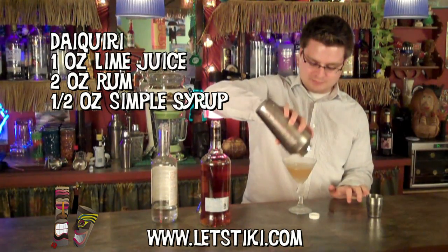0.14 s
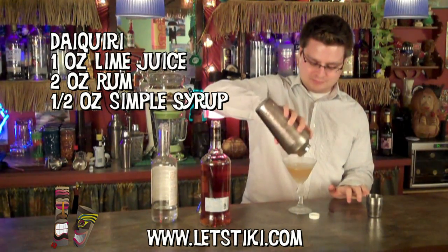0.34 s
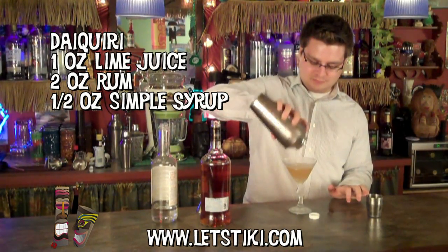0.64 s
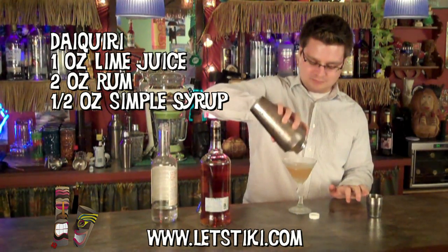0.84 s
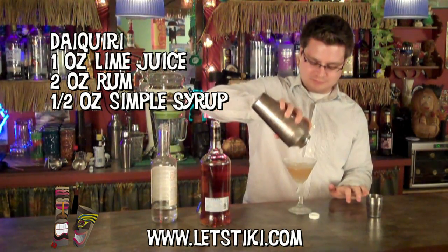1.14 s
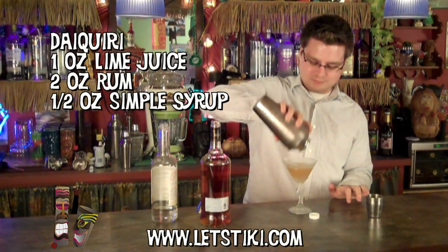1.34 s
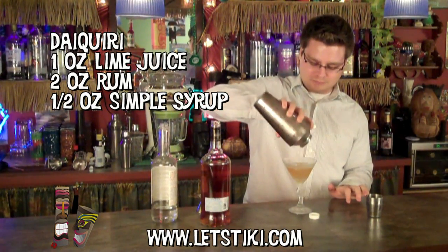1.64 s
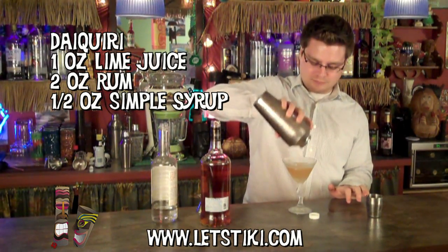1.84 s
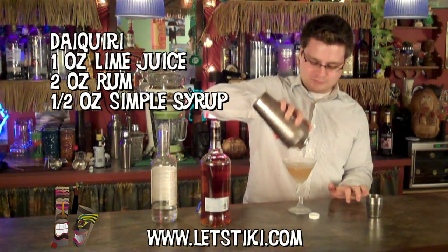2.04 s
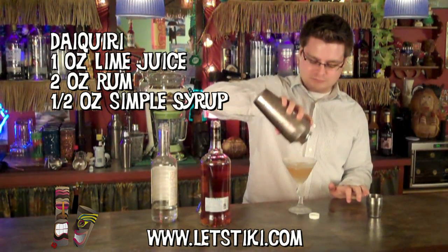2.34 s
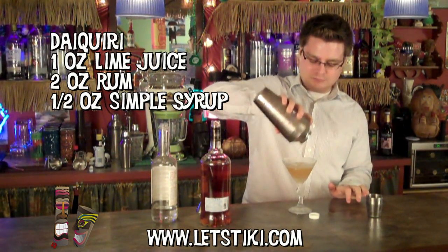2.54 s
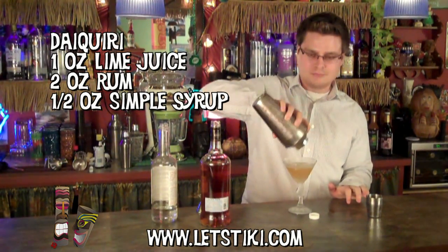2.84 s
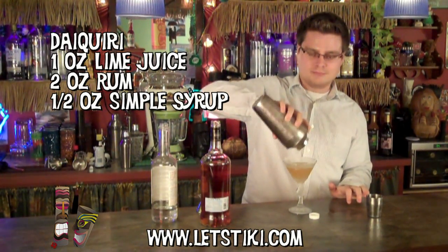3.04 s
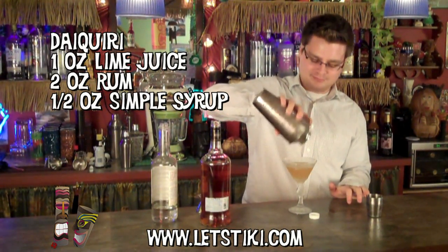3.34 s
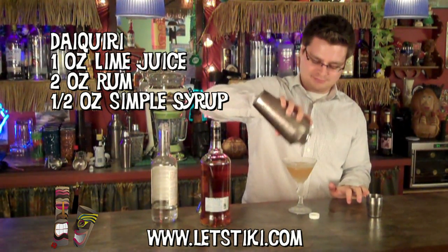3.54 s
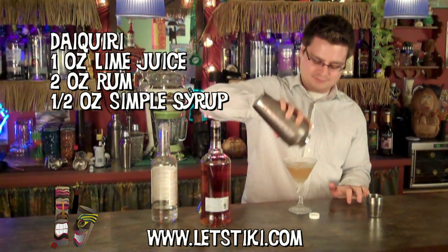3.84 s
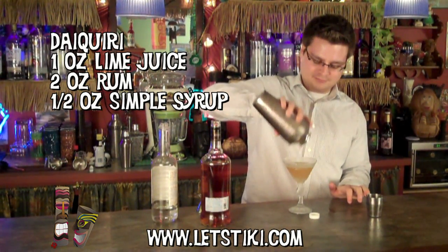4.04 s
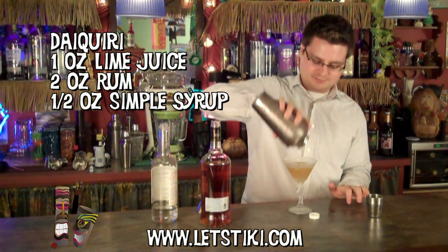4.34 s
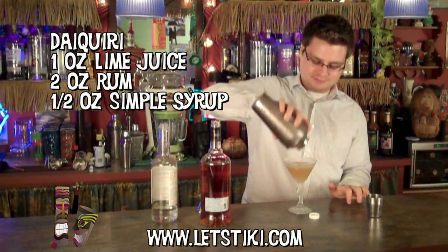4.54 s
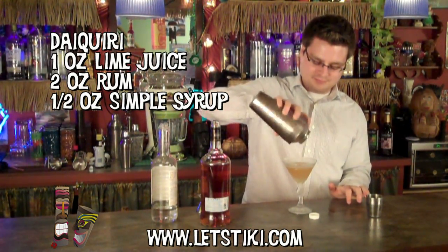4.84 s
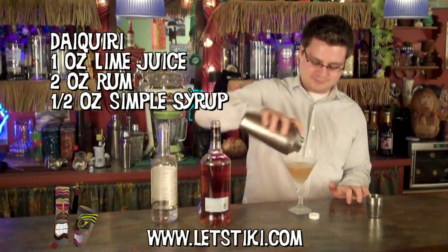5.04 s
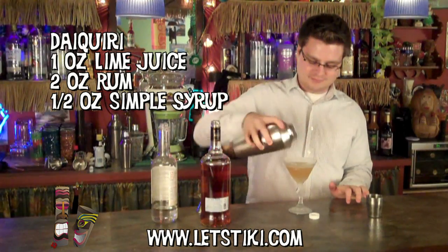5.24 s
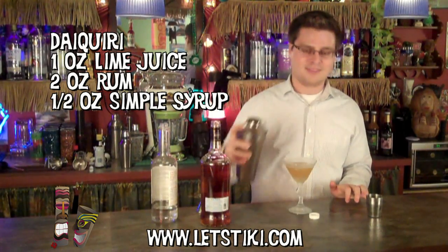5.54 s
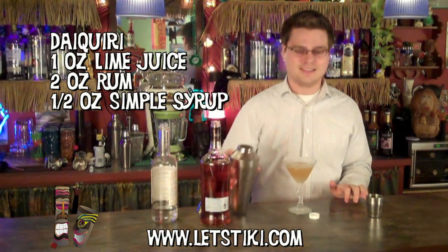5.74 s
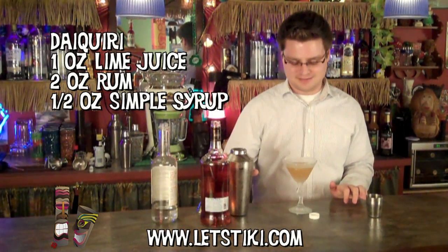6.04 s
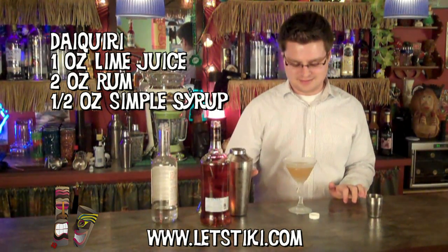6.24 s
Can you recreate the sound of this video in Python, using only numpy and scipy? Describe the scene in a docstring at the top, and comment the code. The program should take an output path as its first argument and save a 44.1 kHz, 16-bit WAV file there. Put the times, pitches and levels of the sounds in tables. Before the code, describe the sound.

Crushed ice rattles in a metal cocktail shaker jogged five or six times a second, then tumbles as it turns upright and is set on wood.

```python
"""Crushed ice rattles in a steel cocktail shaker jogged spout-down over a glass, five to six strokes a second.
Each heap lands and then slides: crackling noise, damped clinks and single lumps drive the resonances of the wall.
The shaker is turned upright and the ice slides to the bottom, ringing the freed wall; last, it is set down on a
wooden bar, whose resonances are pushed by each contact. Throughout, a small furnished room answers with decaying
noise tails, over a rush of air; each of the two microphones has its own treble resonance."""
import sys
import numpy as np
from scipy import signal
from scipy.fft import rfft, irfft, next_fast_len
from scipy.io import wavfile
from scipy.ndimage import uniform_filter1d, minimum_filter1d

SR = 44100
rng = np.random.default_rng(int(sys.argv[2]) if len(sys.argv) > 2 else 0)


def persist_wave(psi):
    """Save psi, clipped to +-1, as 16-bit WAV."""
    counts = np.round(np.clip(psi, -1, 1) * 32767).astype(np.int16)
    wavfile.write(sys.argv[1], SR, np.atleast_2d(counts).T)


N = 281358  # samples, about 6.4 s

# All levels in the tables are relative: each source sets its own gain.
# strokes of the shaker: start_s, landing_db, slide_delay_s, slide_db
STROKES = [(0, -28, .046, -33.5), (0.135, -31.5, .049, -29), (0.292, -22.5, .096, -24),
           (0.446, -27, .097, -26.5), (0.604, -26, .105, -24.5), (0.811, -20.5, .085, -20),
           (0.987, -21.5, .078, -20), (1.163, -23, .083, -20), (1.346, -25, .072, -18),
           (1.51, -20, .084, -16.5), (1.685, -19.5, .075, -18.5), (1.86, -26, .069, -22),
           (2.039, -21, .078, -19), (2.217, -26.5, .073, -25), (2.401, -17, .082, -20),
           (2.597, -21, .078, -18.5), (2.787, -26, .094, -20.5), (2.986, -18.5, .098, -17.5),
           (3.192, -18.5, .074, -19), (3.391, -24, .053, -23), (3.578, -21.5, .077, -20.5),
           (3.762, -26, .076, -20.5), (3.952, -22.5, .083, -22), (4.151, -16.5, .1, -17),
           (4.36, -16.5, .093, -14), (4.534, -22.5, .1, -12.5), (4.73, -20.5, .074, -16.5),
           (4.911, -23.5, .09, -18.5)]
# ice tumbling outside the strokes, loudest as the shaker is turned upright: time_s, level_db
TUMBLE = [(0, -22), (.25, -70.5), (.4, -33.5), (.7, -27.5), (.8, -37), (5.05, -37.5), (5.15, -43.5),
          (5.21, -26.5), (5.3, -21), (5.372, -17), (5.385, -24), (5.46, -17), (5.51, -19), (5.56, -23.5),
          (5.64, -23.5), (5.7, -34), (5.8, -33), (5.92, -42), (5.97, -52), (6.05, -75)]
# loudest single lumps on the wall, and the last chips settling: start_s, level_db, body_db (over level_db)
LUMPS = [(.136, -9, -14.5), (.3006, -30, -26), (.3819, -11, -37), (.4519, -14, -31), (.4743, -7, -9.5),
         (.5195, -11, -12), (.5962, -7.5, -11.5), (.6978, -10.5, -7.5), (.8108, -15.5, -13),
         (.9945, -7.5, -10), (1.051, -8, -35), (1.3538, -11, -6.5), (1.3652, -5.5, -13), (1.3957, -10, -33),
         (1.512, -10, -24), (1.5462, -4.5, -11.5), (1.5658, -5.5, -34), (1.6928, -8.5, -18),
         (1.8694, -7, -38), (2.036, -4.5, -12), (2.065, -11.5, -25), (2.094, -6.5, -35),
         (2.2658, -12.5, -21), (2.4152, -32, -7), (2.478, -17.5, -34), (2.6025, -8.5, -20),
         (2.6395, -17, -16), (2.777, -15, -11), (2.802, -13, -13), (2.824, -8.5, -7.5), (2.8609, -12, -17),
         (2.9831, -12.5, -2.5), (3.015, -10, -6), (3.047, -7.5, -33), (3.0719, -9, -33), (3.087, -23, -22),
         (3.097, -20, -25), (3.1952, -3.5, -26), (3.245, -11, -34), (3.3949, -6.5, -29), (3.4042, -5, -19),
         (3.432, -5.5, -11), (3.5871, 0.5, -15.5), (3.6431, -7, -36), (3.777, -0.5, -17.5),
         (3.9562, -5.5, -22), (4.1604, -2.5, -36.5), (4.2317, -4, -17), (4.3578, -12, -5),
         (4.379, 4, -13.5), (4.4201, -6.5, -21), (4.4328, -1, -37), (4.559, -5, -17), (4.575, -15, 0),
         (4.6098, -18, -16), (4.6201, -3, -34), (4.741, -6, -25.5), (4.796, -14.5, -0.5),
         (4.8036, 2.5, -25), (4.9265, -5.5, -18.5), (5.001, -5.5, -27), (5.2114, -17, -0.5),
         (5.3103, -2.5, -23.5), (5.3796, 5.5, -24), (5.4151, 0, -30), (5.432, -4, -27.5), (5.444, -2, -32),
         (5.458, -5.5, -30), (5.494, -6, -33), (5.5768, -4, -36), (5.636, -7, -34), (5.8391, -11.5, -39),
         (5.8698, -18, 1), (5.9073, -18, -11), (6.1494, -46, -13), (6.2507, -41.5, -27),
         (6.3121, -37.5, -24), (6.3744, -42, -10)]
# larger pieces that ring out at their own pitch: start_s, level_db, pitch_hz, t60_s
RINGERS = [(.872, -24.5, 1670, 0.081), (1.713, -20.5, 2630, 0.014), (1.719, -27, 1206, 0.051),
           (2.421, -17, 2680, 0.023), (3.02, -17, 2830, 0.014), (4.574, -5.5, 2800, 0.01),
           (6.139, -55, 6250, 0.14)]
# heavy lumps striking the free wall: start_s, blow_db
STRIKES = [(5.381, -2), (5.398, 9), (5.415, 11.5), (5.43, 5.5), (5.478, 6)]
# contacts with the bar top: start_s, push_db, sharp_db (over push_db, for the higher resonances)
CONTACTS = [(3.107, -27.5, -1), (5.869, -4.5, -1.5), (5.904, -25, -18), (6.059, -50, 10),
            (6.118, -32, -5.5), (6.136, -27.5, -5.5), (6.174, -46, -15.5), (6.21, -50, -20),
            (6.355, -35.5, -3.5)]
# direction of a lump, right as the heap lands and left as it slides:
# time_s (from 2 * LEAD_S ahead of the stroke), left_over_right_db
LUMP_PAN = [(0, -3), (.05, 1), (.09, 12), (.2, 2)]
# the wall as the shaker turns over: time_s, freedom (0-1, how freely it hangs),
# load (0-1, share of ice still loading the neck)
FREEDOM = [(.2, .035, .85), (5.05, .035, .62), (5.372, .1, .45), (5.382, .9, .4), (5.45, .9, .4),
           (5.465, .1, .4), (5.51, .2, .4), (5.7, .02, .3)]
# resonances of the wall under ice and fingers: centre_hz, width_hz, peak_db
LOADED_MODES = [(500, 75, 4.5), (740, 46, -23), (1197, 215, 5.5), (1293, 140, 1.5), (1910, 81, 8),
                (1875, 75, 4), (2003, 80, 5), (2277, 99, 1), (2550, 180, -14.5), (4680, 89, -43.5),
                (6040, 61, -1.5)]
# resonances of the wall hanging free: centre_hz, width_hz, peak_db
FREE_MODES = [(2275, 28, 25), (2960, 60, 6), (3290, 50, 2), (4470, 38, 20), (5510, 60, -3), (6750, 70, 2),
              (7400, 80, 6), (8680, 80, 5), (11000, 80, 3)]
# resonances of air and wall where the ice has left the neck: centre_hz, width_hz, peak_db
UPRIGHT_MODES = [(2230, 300, 3), (4300, 500, -3)]
# resonances of the wooden bar top: centre_hz, width_hz, peak_db
BAR_MODES = [(105.5, 20, -10.5), (177, 12, -4), (314, 32, 2), (420, 77, 3), (560, 193, -1), (795, 34, 6.5),
             (810, 61, 3.5), (990, 60, -16), (1265, 200, -1), (1473, 82, -2), (1748, 31, -5),
             (2040, 350, -35), (2790, 460, -17)]
# colour of ice crackling on steel: freq_hz, gain_db
ICE_COLOUR = [(60, -46.5), (200, -31), (600, -23.5), (1200, -17), (1550, -13.5), (1800, -7), (3300, -6.5),
              (4300, -1), (5000, 0.5), (6400, 3.5), (8000, -1.5), (9800, -5), (12000, -11.5),
              (14500, -14.5)]
# likeness of left and right: freq_hz, likeness (0-1)
ALIKE = [(40, .4), (100, 0.59), (300, 0.97), (1500, 0.88), (3000, 0.6), (3800, 0.088), (6000, 0.28),
         (8000, 0.75), (12000, .3)]
# decay of the room: freq_hz, t60_s
ROOM_DECAY = [(150, 0.5), (1000, 0.37), (4000, 0.23), (12000, 0.21)]
# colour of the room tone: freq_hz, gain_db
AIR_COLOUR = [(30, -6.5), (100, -7.5), (300, 2), (700, -3), (1500, -7.5), (3000, -15), (8000, -14.5),
              (14500, -22.5)]
# treble of the left and the right microphone port: freq_hz, gain_db
LEFT_PORT = [(4000, 0), (5500, -1), (6400, -2), (6800, 2), (7350, 10), (7900, 5), (8700, -3), (14500, -3)]
RIGHT_PORT = [(4000, 0), (5300, 2), (6050, 5), (6400, -1), (7350, -4), (7900, -7), (8700, -13), (9800, -13),
              (11000, -16), (12300, -21), (14500, -33)]

LAND_RISE_S, LAND_T60_S = .0046, .18  # landing: time constant of the rise, then the decay
SLIDE_SIGMA_S = .031  # standard deviation of the bell-shaped slide
SMALL_DB, SMALL_BODY_DB, SMALL_SCATTER_DB = 2.5, -17.5, 4  # random smaller lumps, over the moving ice
LEAD_S, LEAD_DB, LEAD_BODY_DB = 0.0082, -2, -5.5  # a light chip runs ahead of a landing heap
BODY_SPLIT_HZ = 2600  # body of a lump below, brightness above
BAR_SPLIT_HZ = 930  # dull push below, sharp push above
TOP_HZ = 14200  # upper band limit


def shaker():
    """Chips, clinks and lumps strike the wall, whose ringing depends on what rests on it."""
    moving = motion()
    loose = pair(rattle()) + amp(-10) * clinks(count=3000, centre_hz=3564, octaves=0.701, cycles=4.7, scatter_db=3.0)
    single = lumps(LUMPS + small_lumps(moving, count=90))
    ice = filtered(moving * loose + single, causal(ICE_COLOUR))

    time_s, *shares = np.transpose(FREEDOM)
    free, loaded = [np.clip(np.interp(np.arange(N) / SR, time_s, share), 0, 1) for share in shares]
    # ice lying on the wall damps both what enters and what still rings
    struck = ice * np.sqrt(free)
    for start_s, blow_db in STRIKES:
        struck[:, round(start_s * SR)] += amp(blow_db)
    free_ring = np.sqrt(free) * filtered(struck, modes(FREE_MODES))
    loaded_ring = filtered(ice * loaded, modes(LOADED_MODES))
    upright_ring = filtered(ice * (1 - loaded), modes(UPRIGHT_MODES))
    return ice + loaded_ring + upright_ring + free_ring


def motion():
    """Strength of the moving ice: a heap lands at each stroke and dies away, then the rest slides after it."""
    t = np.arange(N) / SR
    power = amp(np.interp(t, *np.transpose(TUMBLE))) ** 2
    for start_s, landing_db, slide_delay_s, slide_db in STROKES:
        first = round(start_s * SR)
        u = t[first:][:SR // 2] - start_s
        landing = amp(landing_db + 5 - 60 * u / LAND_T60_S) * (1 - np.exp(-u / LAND_RISE_S))
        slide = amp(slide_db) * np.exp(-((u - slide_delay_s) / SLIDE_SIGMA_S) ** 2 / 2)
        power[first:][:len(u)] += landing ** 2 + slide ** 2
    return np.sqrt(power)


def rattle():
    """Envelope of the crackle: random chips of uneven size, each a sharp onset that dies, over a steady floor."""
    hits = rng.random(N) < 1200 / SR  # 1200 chips a second
    chips = hits * amp(1.8 * np.minimum(rng.exponential(size=N), 4.5))
    return unit(np.sqrt(bursts(chips ** 2, fall_s=0.014) + .5))


def clinks(count, centre_hz, octaves, cycles, scatter_db):
    """Pieces of ice knocking together: short damped tones of scattered pitch, size and direction."""
    when, pitch = rng.random(count), rng.standard_normal(count)
    size, pan_db = rng.exponential(size=count), rng.standard_normal(count)
    hz = np.clip(centre_hz * 2 ** (octaves * pitch), 500, 13000)[:, None]
    t = np.arange(600) / SR
    level = amp(scatter_db * np.minimum(size, 4.5))[:, None]
    tone = level * np.sin(2 * np.pi * hz * t) * np.exp(-t * hz / cycles)
    at = ((when * N).astype(int)[:, None] + np.arange(600)).ravel()
    sides = [(tone * amp(side * pan_db)[:, None]).ravel() for side in (1, -1)]
    return unit(np.array([np.bincount(at, tones, N + 600)[:N] for tones in sides]))


def lumps(rows):
    """Each lump is a noise burst of a few milliseconds with its own weight of body; its pan follows the stroke."""
    bright, body = np.zeros((2, N + SR)), np.zeros((2, N + SR))
    t = np.arange(SR // 25) / SR
    envelope = amp(-60 * t / .016) * (1 - np.exp(-t / .0003))
    starts = np.transpose(STROKES)[0] - 2 * LEAD_S
    for start_s, level_db, body_db in rows:
        pan_db = np.interp(start_s - starts[starts <= start_s].max(), *np.transpose(LUMP_PAN))
        crack = spread(rng.standard_normal((2, len(t)))) * envelope
        side_db = pan_db / 2 * np.array([[1], [-1]])
        crack *= amp(level_db + side_db) / np.linalg.norm(crack[0])
        first = round(start_s * SR)
        bright[:, first:][:, :len(t)] += amp(16.0) * crack
        body[:, first:][:, :len(t)] += amp(body_db + 26.5) * crack
    low = lambda hz: 1 / (1 + (hz / BODY_SPLIT_HZ) ** 8)
    soft = lambda hz: 1 / (1 + 1j * hz / 12000)  # wet ice gives a little on contact
    return filtered(body[:, :N], low) + filtered(bright[:, :N], lambda hz: (1 - low(hz)) * soft(hz))


def small_lumps(moving, count):
    """Rows like LUMPS: one ahead of each heap from the third on, others more often and louder in stronger motion."""
    draw = rng.random((count, 3))
    at = np.searchsorted(np.cumsum(moving) / moving.sum(), draw[:, 0]).clip(0, N - 1)
    level_db = 20 * np.log10(moving[at]) + SMALL_DB + SMALL_SCATTER_DB * draw[:, 1]
    body_db = SMALL_BODY_DB + 16 * (draw[:, 2] - .5)
    leads = [(start_s - LEAD_S, landing_db + LEAD_DB, LEAD_BODY_DB) for start_s, landing_db, *_ in STROKES[2:]]
    return leads + list(zip(at / SR, level_db, body_db))


def ringers():
    """A larger piece of ice sounds one damped tone with a soft onset."""
    out, t = np.zeros(N + SR), np.arange(SR // 10) / SR
    for start_s, level_db, pitch_hz, t60_s in RINGERS:
        envelope = amp(level_db - 60 * t / t60_s) * (1 - np.exp(-t / 0.0009))
        out[round(start_s * SR):][:len(t)] += envelope * np.sin(2 * np.pi * pitch_hz * t)
    return out[:N]


def bar_top():
    """Each contact has its own share of dull and sharp push, for the lower and higher resonances of the wood."""
    dull, sharp = np.zeros((2, N))
    for start_s, push_db, sharp_db in CONTACTS:
        dull[round(start_s * SR)] = amp(push_db + 30.5)
        sharp[round(start_s * SR)] = amp(push_db + sharp_db + 29.5)
    low_modes = [mode for mode in BAR_MODES if mode[0] < BAR_SPLIT_HZ]
    high_modes = [mode for mode in BAR_MODES if mode[0] > BAR_SPLIT_HZ]
    return filtered(dull, modes(low_modes)) + filtered(sharp, modes(high_modes))


def room(x):
    """Overlapping pieces of the sound each get their own noise tail; every frequency dies at its own speed."""
    out, hop = np.zeros((2, N + SR)), SR // 4
    window = signal.get_window("hann", 2 * hop)
    padded = np.pad(x, ((0, 0), (hop, 2 * hop)))
    for i in range(0, N + hop, hop):
        hz, t, grains = signal.stft(rng.standard_normal((2, SR // 2)), SR, nperseg=256)
        decay = amp(-60 * t / along(ROOM_DECAY, hz)[:, None])
        tail = spread(signal.istft(grains * decay, SR, nperseg=256)[1])
        tail = tail / np.linalg.norm(tail[0])
        wet = signal.fftconvolve(padded[:, i:i + 2 * hop] * window, tail, axes=1)
        out[:, i:][:, :wet.shape[1]] += wet[:, :N + SR - i]
    return out[:, hop - 200:][:, :N]  # the tails set in 200 samples (4.5 ms) late


def room_tone():
    """A low steady rush of air in the room: coloured stereo noise."""
    return amp(-59.0) * unit(filtered(pair(1), lambda hz: amp(along(AIR_COLOUR, hz))))


def amp(db):
    """Gain of a level in dB."""
    return 10 ** (np.asarray(db) / 20)


def unit(x):
    """x at rms 1."""
    return x / np.sqrt(np.mean(x ** 2) + 1e-20)


def along(points, hz):
    """Values of (freq_hz, value) points, read on a log frequency axis."""
    f, v = np.transpose(points)
    return np.interp(np.log(hz + 1), np.log(f + 1), v)


def filtered(x, response):
    """x times a complex response of frequency."""
    m = next_fast_len(N + SR // 2)
    return irfft(rfft(x, m) * response(np.fft.rfftfreq(m, 1 / SR)), m)[..., :N]


def causal(points):
    """The minimum-phase response with the given (freq_hz, gain_db) colour, by folding the cepstrum."""
    def response(hz):
        cepstrum = irfft(np.log(amp(along(points, hz))))
        cepstrum[1:len(hz) - 1] *= 2
        cepstrum[len(hz):] = 0
        return np.exp(rfft(cepstrum))
    return response


def modes(table):
    """The summed response of damped resonances, with alternating sign."""
    def response(f):
        return sum((-1) ** k * amp(peak_db) * 1j * f * width / (centre * centre - f * f + 1j * f * width)
                   for k, (centre, width, peak_db) in enumerate(table))
    return response


def bursts(impulses, fall_s):
    """Each impulse becomes an exponential decay that falls to a thousandth in fall_s."""
    return signal.lfilter([1], [1, -amp(-60 / (fall_s * SR))], impulses)


def pair(envelope):
    """Stereo noise under an envelope."""
    return spread(envelope * rng.standard_normal((2, N)))


def spread(two):
    """Two unrelated signals mixed into a stereo pair whose likeness varies with frequency."""
    length = two.shape[1]
    m = next_fast_len(length)
    turn = np.arccos(np.clip(along(ALIKE, np.fft.rfftfreq(m, 1 / SR)), 0, 1)) / 2
    mid, side = irfft(rfft(two, m) * [np.cos(turn), np.sin(turn)], m)[:, :length]
    return np.array([mid + side, mid - side])


def scene():
    """Shaker and bar top with their echoes over the room tone."""
    ice = shaker() + ringers()
    wood = bar_top() * np.ones((2, 1))
    echoes = room(amp(-2.5) * ice[:1] + wood[:1])
    return ice + wood + echoes + room_tone()


def record(dry):
    """Each microphone port colours the treble, the left hears a little later; hiss, fast limiter, band limit."""
    left = lambda hz: causal(LEFT_PORT)(hz) * np.exp(-2j * np.pi * hz * .00005)  # 50 microseconds late
    ports = np.array([filtered(dry[0], left), filtered(dry[1], causal(RIGHT_PORT))])
    ports = ports + amp(-62.0) * rng.standard_normal((2, N))  # hiss
    needed = np.minimum(1, .98 / (np.abs(ports) + 1e-9))
    gain = uniform_filter1d(minimum_filter1d(needed, size=33, axis=1), size=17, axis=1)
    # above the limit: a step down, then 0.1 dB per Hz to a floor
    edge = lambda hz: amp(-np.clip(hz - TOP_HZ, 0, 900) * .1) * np.where(hz > TOP_HZ, .2, 1)
    return filtered(gain * ports, edge)


dry = scene()
out = record(dry)
persist_wave(out)
```